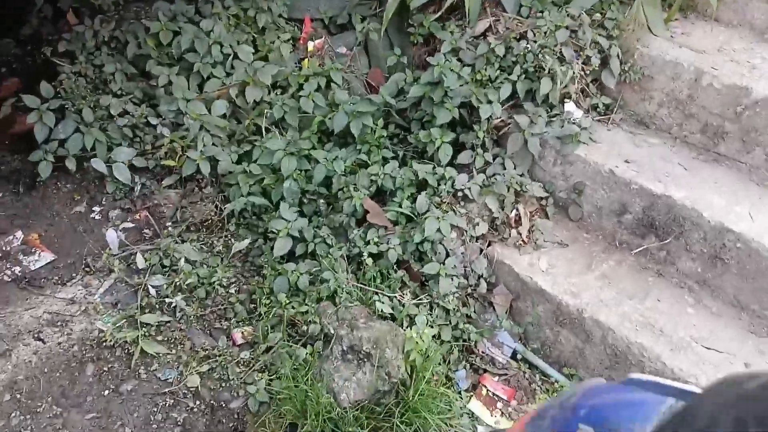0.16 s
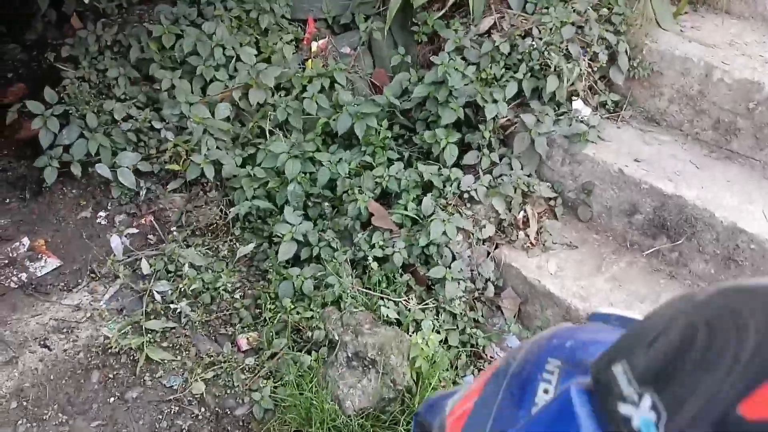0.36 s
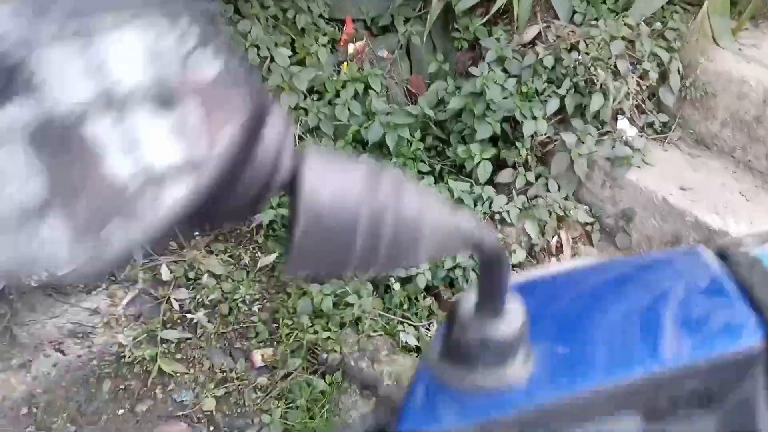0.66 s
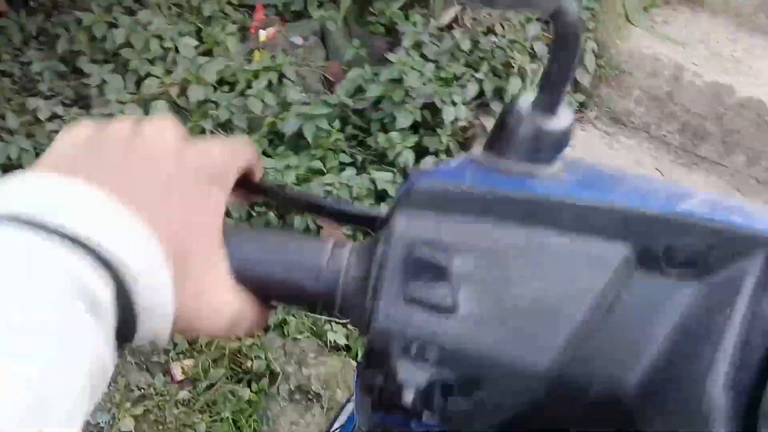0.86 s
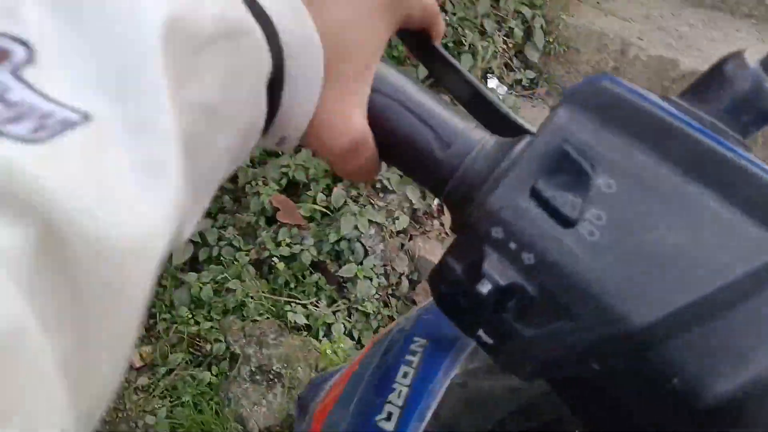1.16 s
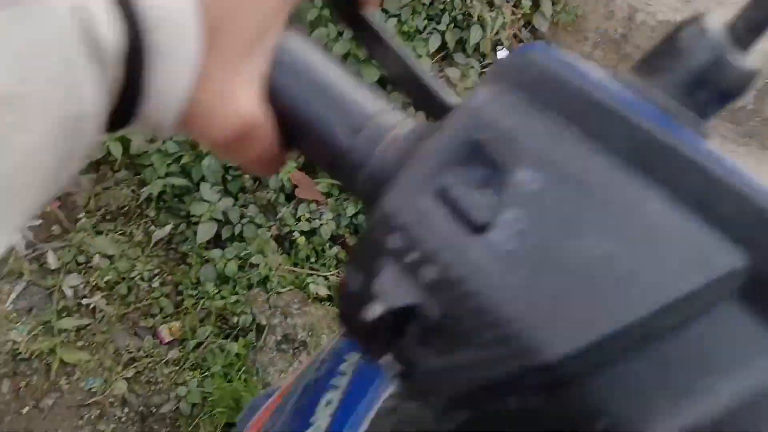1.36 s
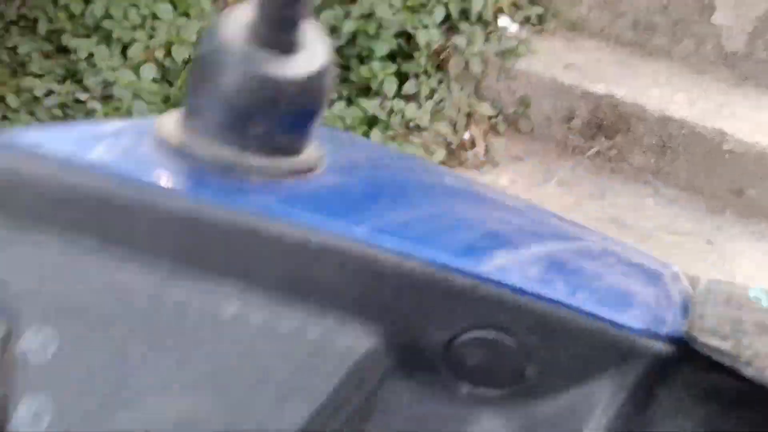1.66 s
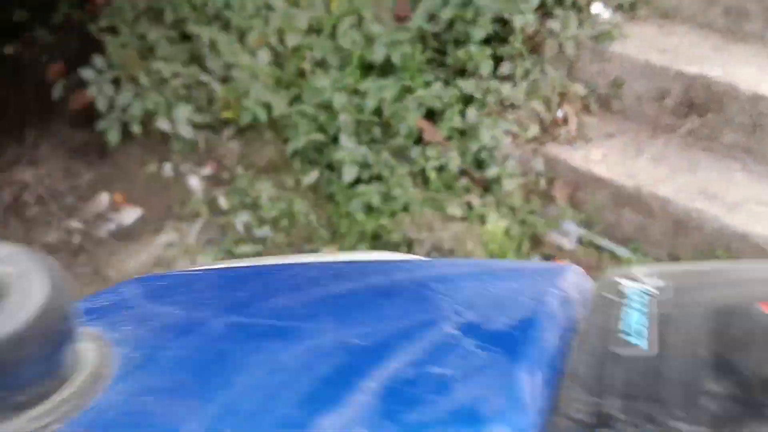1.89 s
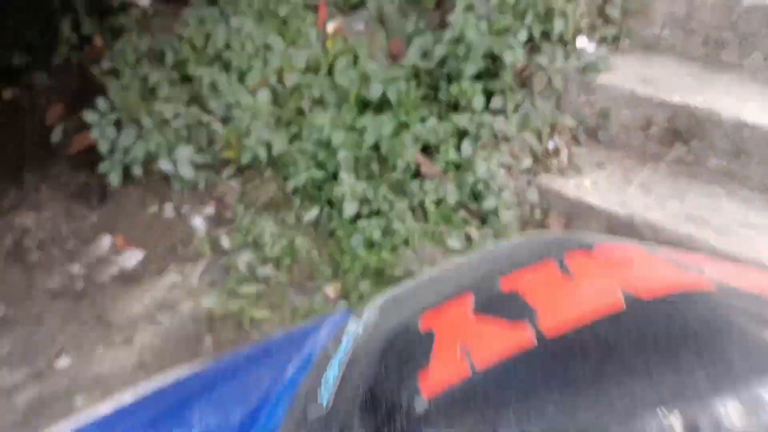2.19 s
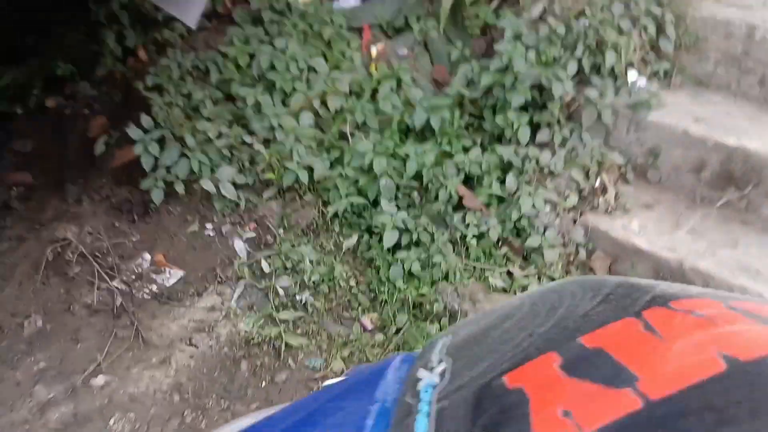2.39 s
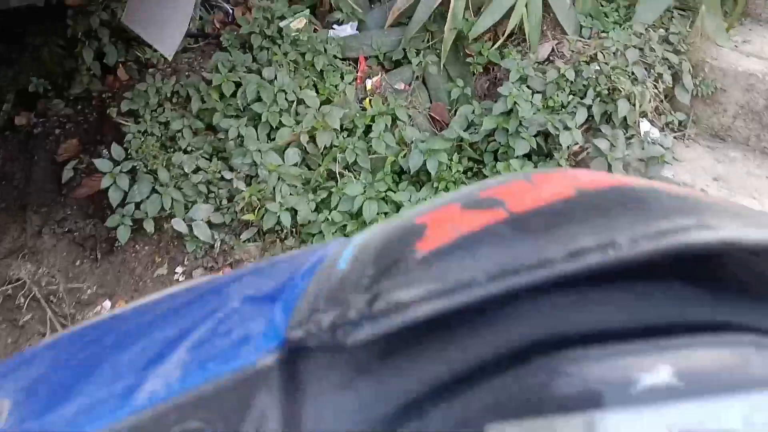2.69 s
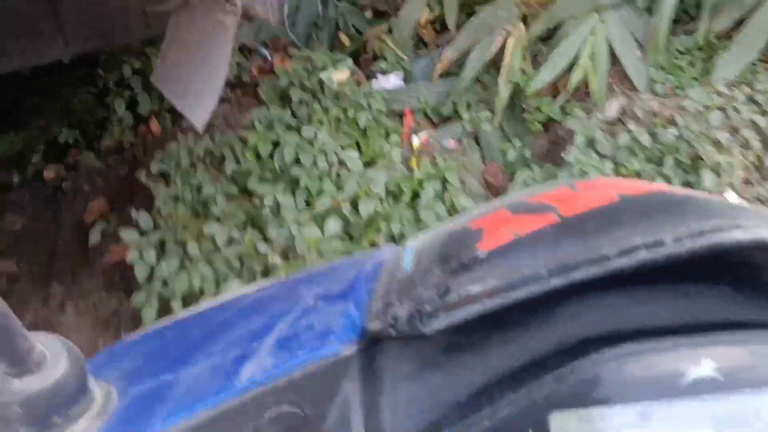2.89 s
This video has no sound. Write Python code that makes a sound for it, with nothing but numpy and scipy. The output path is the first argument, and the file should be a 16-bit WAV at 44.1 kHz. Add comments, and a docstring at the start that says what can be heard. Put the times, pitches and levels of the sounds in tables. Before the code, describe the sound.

A scooter engine gives a short rev, sinks to a low thumping idle, then revs longer and harder with a growling exhaust and metallic clatter. Light chinks and a few handlebar knocks sound close by, outdoors.

```python
"""A short throttle blip from a parked single-cylinder scooter, then idle, then a longer, harder blip.
Each firing thumps in the exhaust and echoes once. Under throttle the silencer barks and growls, the
engine clatters and gas hisses; at idle the treble almost vanishes. Loose metal chinks, the drive
clanks under load, and a few knocks come from the handlebar, all over faint outdoor air."""
import sys
import numpy as np
from scipy import signal
from scipy.fft import rfft, irfft
from scipy.io import wavfile
from scipy.ndimage import map_coordinates

SR = 44100
rng = np.random.default_rng(int(sys.argv[2]) if len(sys.argv) > 2 else 0)


def unload_audio(sound):
    """Save the sound as a 16-bit wav file, at the path given as the first command line argument."""
    columns = np.transpose(np.atleast_2d(sound))
    # keep every value between -1 and 1, then stretch to whole-number steps
    steps = np.round(np.clip(columns, -1, 1) * 32767)
    wavfile.write(sys.argv[1], SR, steps.astype(np.int16))


N = 134505


def undb(db):
    """Decibels to gain."""
    return 10 ** (np.asarray(db) / 20)


def unit(x):
    """Scale to rms 1."""
    return x / np.sqrt(np.mean(x ** 2))


def curve(x, table, column=1):
    """Interpolate a table column linearly."""
    rows = np.array(table, float)
    return np.interp(x, rows[:, 0], rows[:, column])


def colour(x, outline):
    """Minimum-phase filter with the given (Hz, dB) outline."""
    size = 8192
    hz, db = np.array(outline, float).T
    bins_hz = np.maximum(np.arange(size // 2 + 1) * SR / size, 1)
    gain = undb(np.interp(np.log(bins_hz), np.log(hz), db))
    cepstrum = irfft(np.log(gain))
    cepstrum[1:size // 2] *= 2
    cepstrum[size // 2 + 1:] = 0
    return signal.fftconvolve(x, irfft(np.exp(rfft(cepstrum))))[:len(x)]


def flicker(x, width_hz=115, life_s=.065, depth_db=4.3):
    """Narrow frequency bands swell and fade at random, as with a moving microphone; rms 1."""
    hz, s, frames = signal.stft(x, SR, nperseg=1024, noverlap=768)
    grid = np.meshgrid(hz / width_hz, s / life_s, indexing="ij")
    field = map_coordinates(rng.standard_normal((256, 128)), grid, mode="mirror")
    frames = frames * undb(depth_db * np.clip(field, -2, 1.6))
    return unit(signal.istft(frames, SR, nperseg=1024, noverlap=768)[1][:N])


def wander(t, depth_db, step_s=.078):
    """Slow random gain; steady at depth 0."""
    knots_s = np.arange(0, N / SR + step_s, step_s)
    swing = np.clip(rng.standard_normal(200)[:len(knots_s)], -2, 2)
    return undb(depth_db * np.interp(t, knots_s, swing))


def fade(age, t60_s):
    """Exponential decay from age 0."""
    return (age >= 0) * np.exp(-np.log(1000) * np.maximum(age, 0) / t60_s)


def ring(age, modes, rise_s=.0032):
    """Decaying partials with a soft onset."""
    onset = (1 - np.exp(-age / rise_s)) ** 2
    return onset * sum(undb(db) * fade(age, t60) * np.sin(2 * np.pi * hz * age) for hz, t60, db in modes)


def resonate(drive, modes):
    """A few modes rung by a drive signal; rms 1."""
    age = np.arange(SR // 4) / SR
    return unit(signal.fftconvolve(drive, ring(age, modes))[:N])


def smear(drive, t60_s):
    """Dense ringing: the drive convolved with decaying noise; rms 1."""
    age = np.arange(SR // 4) / SR
    tail = rng.standard_normal(len(age)) * fade(age, t60_s)
    return unit(signal.fftconvolve(drive, tail)[:N])


def struck(t, start_s, db, pitch_hz, modes):
    """One blow on a part with partials at ratios of its pitch."""
    out = np.zeros(N)
    near = slice(int(start_s * SR), int(start_s * SR) + SR // 4)
    age = np.maximum(t[near] - start_s, 0)
    out[near] = undb(db) * ring(age, [(pitch_hz * ratio, t60, gain_db) for ratio, t60, gain_db in modes])
    return out


def clicks(times_s, sizes):
    """Impulses, each split between two samples."""
    out = np.zeros(N)
    inside = (times_s > 0) & (times_s < (N - 2) / SR)
    at, size = times_s[inside] * SR, sizes[inside]
    np.add.at(out, at.astype(int), size * (1 - at % 1))
    np.add.at(out, at.astype(int) + 1, size * (at % 1))
    return out


# Air spectrum. Each row: frequency in Hz, gain in dB.
AIR_SPECTRUM = [(25, -3), (100, 15.5), (400, -10), (1000, -15), (2300, -32.5), (4600, -28), (6000, -37.5),
                (15000, -36)]


def air(level_db=-65):
    """Steady, low outdoor noise."""
    return undb(level_db) * unit(colour(rng.standard_normal(N), AIR_SPECTRUM))


# Handlebar knocks. Each row: start in seconds, level in dB, pitch in Hz, relative crack level in dB.
KNOCKS = [(.72, -39, 407, -42), (1.331, -54, 421, -9.5), (2.922, -32, 372.4, -7)]
# Plastic body. Each row: ratio to pitch, t60 in seconds, gain in dB.
KNOCK_MODES = [(1.001, 0.045, 12), (1.14, 0.077, 1), (1.379, 0.048, -4)]
# Crack spectrum. Each row: frequency in Hz, gain in dB.
CRACK_SPECTRUM = [(250, -90), (600, 14), (1000, 12.5), (1700, -13), (2400, 6.5), (3050, 0.5), (3600, -25.5),
                  (4550, -10), (6000, -32), (9000, -41)]


def handlebar(t, crack_t60_s=.1, cutoff_hz=6000):
    """Hollow plastic knocks, each with a short crack."""
    out = np.zeros(N)
    for start_s, db, hz, crack_db in KNOCKS:
        grit = rng.standard_normal(N)
        crack = colour(grit * fade(t - start_s, crack_t60_s), CRACK_SPECTRUM)
        crack /= np.std(colour(grit, CRACK_SPECTRUM))
        out += struck(t, start_s, db, hz, KNOCK_MODES) + undb(db + crack_db) * crack
    return signal.sosfilt(signal.butter(6, cutoff_hz, fs=SR, output="sos"), out)


# Metal chinks. Each row: start in seconds, level in dB, pitch in Hz.
CHINKS = [(0.084, -62, 4360), (.566, -57, 3210), (0.617, -55, 4510), (0.612, -56, 1586), (.62, -55, 3380),
          (0.646, -50.5, 1300), (0.66, -54, 3290), (.695, -62.5, 3290), (.695, -60, 4350),
          (0.73, -65, 4300), (0.767, -62, 1637), (.78, -72, 4380), (0.824, -66, 4590), (.862, -66.5, 3250),
          (1.027, -63, 4440), (1.35, -76, 4550), (1.573, -79, 4400), (1.745, -58.5, 2550),
          (1.79, -58, 4480), (1.84, -49.5, 1463), (3.038, -53, 4380)]
# Loose part. Each row: ratio to pitch, t60 in seconds, gain in dB.
CHINK_MODES = [(0.998, 0.069, 5), (1.014, 0.078, -7.5), (1.46, 0.053, -17)]


def chinks(t):
    """Loose metal strikes and rings briefly."""
    return sum(struck(t, *row, CHINK_MODES) for row in CHINKS)


# Drive clanks. Each row: start in seconds, level in dB, pitch in Hz.
CLANKS = [(0.199, -44.5, 1423), (.295, -44, 898), (.37, -47, 1388), (0.441, -45, 1402), (0.486, -44, 1340),
          (.545, -48.5, 1236), (1.919, -38.5, 1317), (1.952, -42.5, 1510), (2.062, -38, 1484),
          (2.237, -39.5, 1210), (2.311, -37, 1223), (2.357, -37.5, 1530), (2.627, -43, 1200),
          (2.651, -36.5, 1260), (2.697, -33, 1235)]
# Drive part. Each row: ratio to pitch, t60 in seconds, gain in dB.
CLANK_MODES = [(0.881, .06, -14.5), (1, 0.057, 5.5), (1.12, 0.075, -3)]


def clanks(t):
    """The drive clanks under load."""
    return sum(struck(t, *row, CLANK_MODES) for row in CLANKS)


# Mechanical impacts. Each row: position in cycles, level in dB.
IMPACTS = [(0.742, -1), (.81, -1), (1.002, -9), (.13, -1.5), (.27, -10), (0.402, -2), (.61, -6.5)]


def impacts(t, rate_hz, cycle, scatter_db=2, jitter_s=.00007):
    """Impacts locked to the engine cycle, uneven in time and force; rms 1."""
    position, db = np.array(IMPACTS).T
    turns = (np.arange(int(cycle[-1]) + 1)[:, None] + position).ravel()
    times_s = np.interp(turns, cycle, t, left=-1, right=-1)
    late, loud = rng.standard_normal((len(turns), 2)).T
    sizes = undb(np.resize(db, len(turns)) + scatter_db * np.clip(loud, -2, 2))
    return unit(clicks(times_s + jitter_s * late, sizes) / np.sqrt(rate_hz))


def gas(cycle, pulse_depth=.05):
    """Gas noise, peaking slightly at each firing; rms 1."""
    return unit(rng.standard_normal(N) * (1 + pulse_depth * np.cos(2 * np.pi * cycle)))


# Ringing relative to broadband sound. Each row: time in seconds, silencer in dB, casing and covers in dB.
RINGING = [(.1, 21.5, 4.5), (.4, -12.5, -5), (.65, 16.5, 2), (1.0, 14.5, -5), (1.4, -16, -4),
           (1.8, -5, 0.5), (2.1, -36, -9), (2.74, -0.5, -29.5), (2.87, 3.5, -21)]


def metalwork(t, rate_hz, cycle, drive, spectrum, modes):
    """The driven block rings densely; loose parts rattle, each a little early or late."""
    dense = undb(4.5) * smear(drive, t60_s=.025)
    block = flicker(colour(drive + dense, spectrum))
    parts = np.zeros(N)
    for hz, t60_s, db in modes:
        strikes = impacts(t, rate_hz, cycle, scatter_db=5, jitter_s=.004) * wander(t, depth_db=0)
        parts += undb(db) * resonate(strikes, [(hz, t60_s, 0)])
    ringing = undb(curve(t, RINGING, 2))
    return (block + ringing * unit(parts)) / np.hypot(1, ringing)


# Hiss spectrum. Each row: frequency in Hz, gain in dB.
HISS_SPECTRUM = [(900, -33.5), (1800, -5), (2300, -10.5), (2900, -4), (3300, 1), (3850, -10), (4650, -6.5),
                 (5160, -17), (6550, -28.5), (7300, -40.5), (9400, -56.5), (15000, -54)]
# Thin covers. Each row: frequency in Hz, t60 in seconds, level in dB.
COVER_MODES = [(2574, 0.15, -1), (2651, 0.067, 3), (3163, 0.028, 5.5), (3304, 0.055, 1.5), (3874, 0.069, 1),
               (4358, 0.056, 2.5), (4535, 0.12, 3), (4688, 0.03, 1), (5093, .04, -11), (6550, 0.15, -29.5)]


def hiss(t, rate_hz, cycle):
    """Gas noise with faint ticks and rattling covers."""
    drive = gas(cycle) + undb(-10) * impacts(t, rate_hz, cycle)
    return metalwork(t, rate_hz, cycle, drive, HISS_SPECTRUM, COVER_MODES)


# Clatter spectrum. Each row: frequency in Hz, gain in dB.
CLATTER_SPECTRUM = [(500, -7.5), (780, -4), (900, 3), (1100, 3), (1250, -1.5), (1430, 2), (1750, -9.5),
                    (2200, -10.5), (3200, -12.5), (6000, -33.5), (12000, -69.5)]
# Engine casing. Each row: frequency in Hz, t60 in seconds, level in dB.
CASING_MODES = [(820, 0.12, -18.5), (1200, 0.23, -19), (1284, 0.045, 1.5), (1473, 0.021, -2),
                (1591, 0.048, -0.5), (1848, 0.023, -4.5)]


def clatter(t, rate_hz, cycle):
    """Impacts on block and casing, with some gas noise."""
    drive = impacts(t, rate_hz, cycle) + undb(-9) * gas(cycle)
    return metalwork(t, rate_hz, cycle, drive, CLATTER_SPECTRUM, CASING_MODES)


# Bark spectrum. Each row: frequency in Hz, gain in dB.
BARK_SPECTRUM = [(150, -47.5), (230, -5.5), (300, 6.5), (390, -4), (480, -6), (580, -1.5), (690, 4.5),
                 (760, -2.5), (880, -15.5), (1000, -27.5), (1500, -34.5), (9000, -97)]
# Silencer. Each row: frequency in Hz, t60 in seconds, gain in dB.
SILENCER_MODES = [(592.7, 0.071, 12), (634.8, 0.18, 2.5)]


def bark(t, rate_hz, cycle):
    """Impacts and gas excite the silencer, which rings plainest off the throttle."""
    blast = impacts(t, rate_hz, cycle) + undb(-16) * gas(cycle)
    chambers = undb(-1) * smear(blast, t60_s=.016)
    body = flicker(colour(blast + chambers, BARK_SPECTRUM))
    ringing = undb(curve(t, RINGING, 1))
    return (body + ringing * resonate(blast, SILENCER_MODES)) / np.hypot(1, ringing)


# Exhaust harmonics. Each row: multiple of the firing rate, gain in dB.
GROWL_ORDERS = [(7, -6.5), (8, -4), (9, -6), (10, -6.5), (11, -4), (12, -3), (13, 0), (14, 3), (15, 2),
                (16, 1), (17, -2), (18, -4), (19, -8.5), (20, -7.5), (21, -7), (22, -9.5)]
# Growl envelope. Each row: time in seconds, level in dB, tilt in dB per octave.
GROWL_ENVELOPE = [(0.08, -63.5, -16.5), (0.2, -54, -8.5), (0.36, -46.5, -5), (0.48, -41, -3.5),
                  (0.56, -51, -6), (0.64, -75.5, 2), (1.79, -74.5, -10), (1.87, -49.5, -22.5),
                  (1.95, -45, -3.5), (2.12, -42, 3), (2.22, -35, 6), (2.42, -37, 0), (2.49, -39.5, -5),
                  (2.7, -34.5, 10), (2.76, -37, 4), (2.82, -69, 0.5)]


def growl(t, cycle, jitter_s=.00013, scatter_db=2):
    """Firing harmonics swell and brighten with load; every cycle differs a little."""
    late, loud = (np.interp(cycle, np.arange(128), row) for row in rng.standard_normal((2, 128)))
    turn = np.interp(t + jitter_s * late, t, cycle)
    middle_order = np.mean([order for order, _ in GROWL_ORDERS])
    tilt_db = curve(t, GROWL_ENVELOPE, 2)
    out = np.zeros(N)
    for order, db in GROWL_ORDERS:
        gain = undb(db + tilt_db * np.log2(order / middle_order)) * wander(t, depth_db=3.2)
        out += gain * np.cos(2 * np.pi * (order * turn + rng.random()))
    return unit(out) * undb(curve(t, GROWL_ENVELOPE) + scatter_db * loud)


def puff(age, hz, width_s, sag_hz_per_s=340):
    """Gaussian exhaust pulse, falling in pitch as it rings."""
    phase = 2 * np.pi * (hz - .5 * sag_hz_per_s * age) * age
    return -np.cos(phase) * np.exp(-.5 * (age / width_s) ** 2)


# Puff shape. Each row: time in seconds, pitch in Hz, half width in seconds, echo gain in dB.
PUFF_SHAPE = [(.05, 133.6, 0.0062, -16), (.2, 128.6, 0.0035, -8), (.33, 137, 0.0028, -2),
              (.48, 136.6, 0.0027, -2.5), (.57, 133.3, 0.0038, -12), (.66, 114.5, 0.0069, -8),
              (.8, 137, 0.0036, 1), (1.2, 129.5, 0.0042, -13), (1.8, 126.7, 0.0046, -23.5),
              (2.05, 131, 0.0016, -0.5), (2.75, 142, 0.0023, -7), (2.83, 124, 0.0051, -19),
              (2.92, 114.5, 0.0028, -4.5), (3.03, 136.5, 0.0026, 4)]
# Stumbling idle firings. Each row: time in seconds, level change in dB, second puff gain in dB.
STUMBLES = [(1.113, 2.5, -11), (1.175, -19, 1), (1.235, 1, -11.5), (1.303, -8.5, 3), (1.443, -6, -1.5),
            (1.517, -1.5, -10), (1.666, -2.5, -20), (1.735, 0.5, -19)]
# Exhaust pipe response. Each row: frequency in Hz, gain in dB.
PIPE_RESPONSE = [(25, -11), (45, -10), (62, 7), (80, 3.5), (100, -10.5), (135, 0.5), (172, 1), (205, 4.5),
                 (250, 4), (400, -4.5)]


def thumps(t, rate_hz, cycle, level_db, echo_s=.0114, echo_smear_s=.0026, scatter_db=.6):
    """One low puff per firing plus a duller echo; under throttle puffs shorten and the pipe booms."""
    idle_below_hz, second_puff_s = 19, .02
    boom_from_hz, boom_full_hz = 17, 32
    out = np.zeros(N)
    for at in np.interp(np.arange(1, int(cycle[-1]) + 1), cycle, t):
        firing_hz = np.interp(at, t, rate_hz)
        hz, width_s, echo_db = (curve(at, PUFF_SHAPE, column) for column in (1, 2, 3))
        stumble = (row[1:] for row in STUMBLES if abs(row[0] - at) < .5 / firing_hz)
        change_db, second_db = next(stumble, (0, -10.5))
        near = slice(max(int(at * SR) - SR // 20, 0), int(at * SR) + SR // 20)
        age = t[near] - at
        dull_width_s = np.hypot(width_s, echo_smear_s)
        shot = puff(age, hz, width_s) + undb(echo_db) * puff(age - echo_s, hz, dull_width_s)
        if firing_hz < idle_below_hz:
            shot += undb(second_db) * puff(age - second_puff_s, hz, dull_width_s)
        shot *= np.sqrt(SR / firing_hz / np.sum(shot ** 2))  # rms 1 over one cycle
        db = np.interp(at, t, level_db) + scatter_db * rng.standard_normal() + change_db
        out[near] += undb(db) * shot
    boom = np.clip((rate_hz - boom_from_hz) / (boom_full_hz - boom_from_hz), 0, 1)
    return boom * colour(out, PIPE_RESPONSE) + (1 - boom) * out


# Engine speed. Each row: time in seconds, firing rate in Hz.
FIRING_RATE = [(0.0, 19.31), (0.2, 31.61), (0.38, 36.54), (0.49, 36.79), (0.56, 32.18), (0.75, 23.87),
               (0.95, 18.43), (1.25, 15.45), (1.5, 13.16), (1.64, 13.26), (1.76, 18.51), (1.88, 29.93),
               (2.03, 37.94), (2.25, 41.31), (2.5, 41.76), (2.74, 41.5), (2.8, 32.83), (3.05, 22.04)]
# Engine mix. Each row: time in seconds, then thump, bark, clatter and hiss levels in dB.
ENGINE_LEVELS = [(0, -42, -69, -89, -79), (0.08, -36.5, -81, -68, -72.5), (0.18, -32, -46, -61, -58),
                 (0.3, -30.5, -45, -52, -54.5), (0.48, -33.5, -43, -53, -52),
                 (0.59, -32.5, -51.5, -62.5, -58.5), (0.75, -36, -58, -70.5, -75),
                 (0.92, -41, -53, -79, -81), (1.12, -46, -76.5, -82.5, -83), (1.5, -41, -86.5, -87, -89.5),
                 (1.72, -43, -86.5, -80, -79.5), (1.83, -35.5, -55.5, -61, -59.5),
                 (1.96, -32, -42, -46.5, -53), (2.3, -31, -38, -42.5, -49), (2.5, -29, -40.5, -43, -46.5),
                 (2.74, -30.5, -42, -43.5, -48.5), (2.82, -32.5, -51, -56.5, -58),
                 (3.02, -37.5, -56, -68.5, -71)]


def scene():
    """Engine layers on one firing clock, plus chinks, clanks, knocks and air; mono."""
    t = np.arange(N) / SR
    background = air()
    rate_hz = curve(t, FIRING_RATE)
    cycle = .89 + np.cumsum(rate_hz) / SR  # fires at each whole number
    thump_db, bark_db, clatter_db, hiss_db = (curve(t, ENGINE_LEVELS, column) for column in (1, 2, 3, 4))
    engine = thumps(t, rate_hz, cycle, thump_db) + growl(t, cycle)
    engine += undb(bark_db) * bark(t, rate_hz, cycle)
    engine += undb(clatter_db) * clatter(t, rate_hz, cycle)
    engine += undb(hiss_db) * hiss(t, rate_hz, cycle)
    return (background + handlebar(t) + chinks(t) + clanks(t) + engine)[None]


def record(dry):
    """Steep low-pass on the top treble."""
    cutoff_hz = 15400
    return signal.sosfilt(signal.ellip(8, .2, 70, cutoff_hz, fs=SR, output="sos"), dry)


dry = scene()
out = record(dry)
unload_audio(out)
```